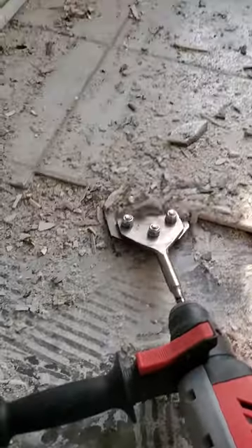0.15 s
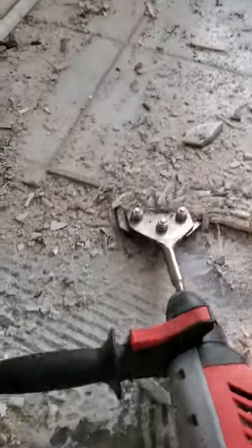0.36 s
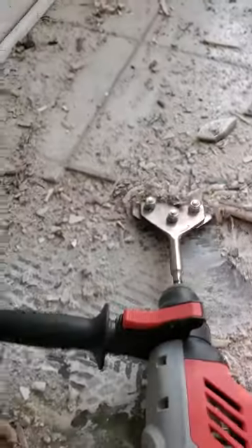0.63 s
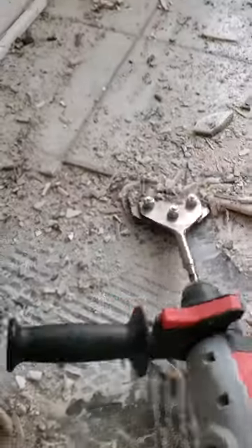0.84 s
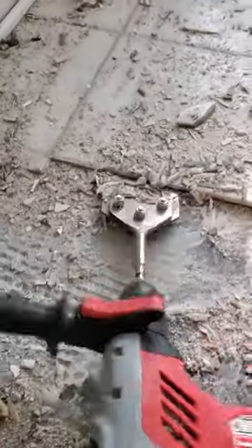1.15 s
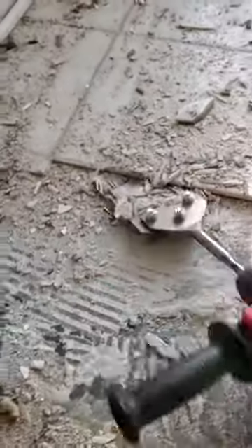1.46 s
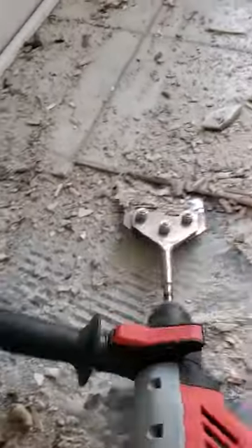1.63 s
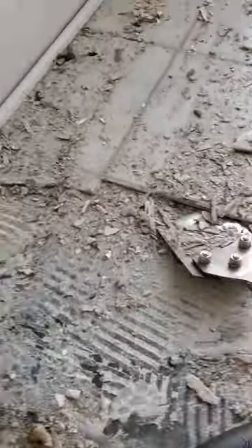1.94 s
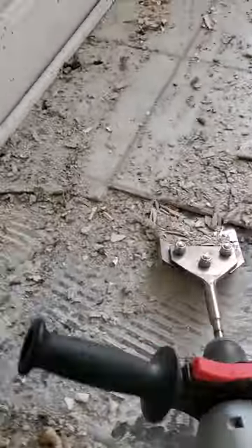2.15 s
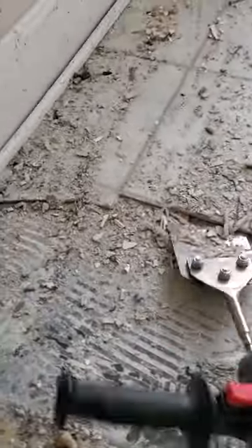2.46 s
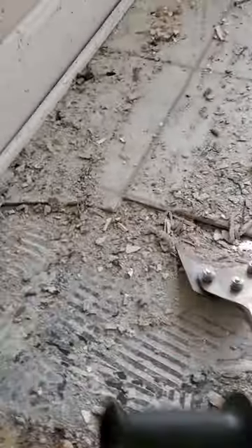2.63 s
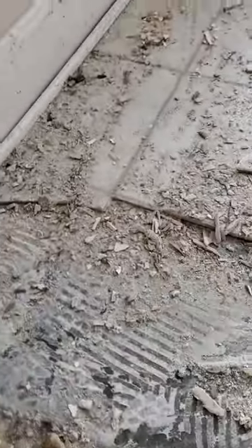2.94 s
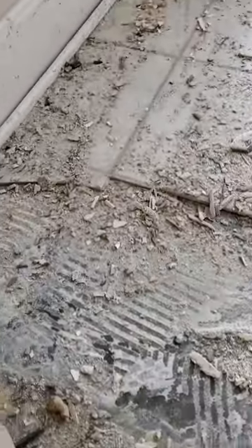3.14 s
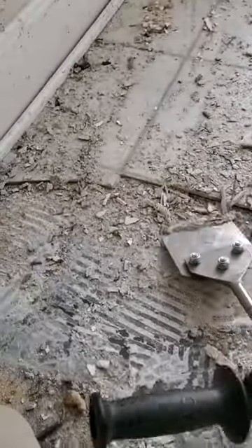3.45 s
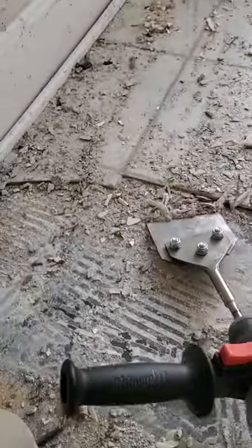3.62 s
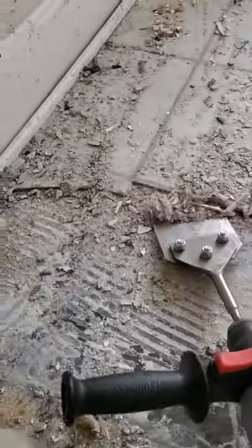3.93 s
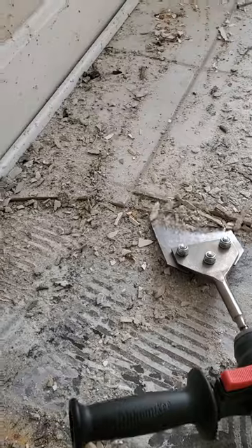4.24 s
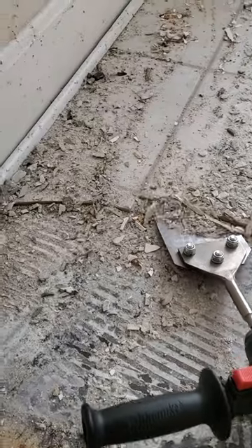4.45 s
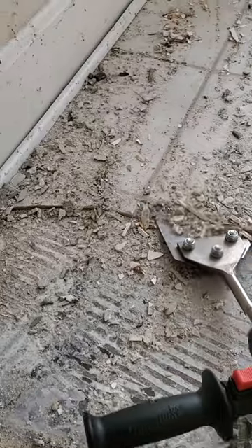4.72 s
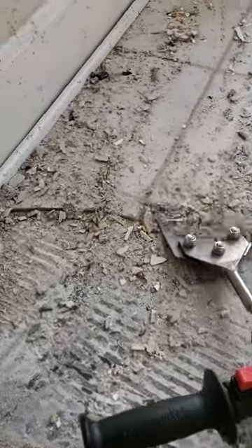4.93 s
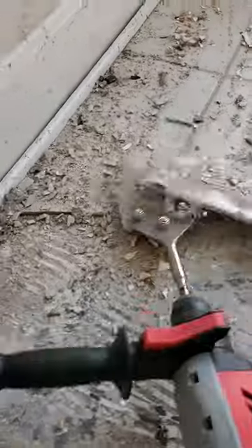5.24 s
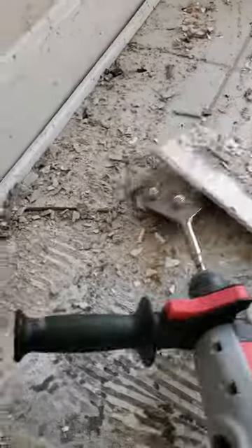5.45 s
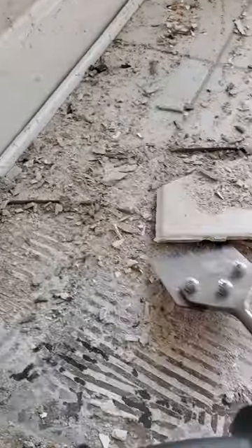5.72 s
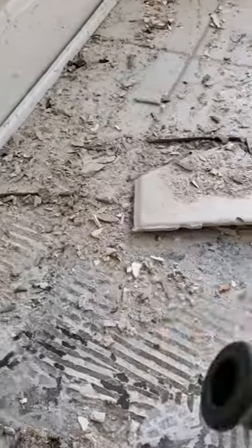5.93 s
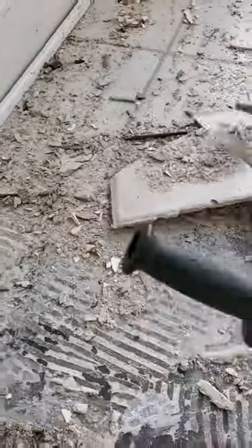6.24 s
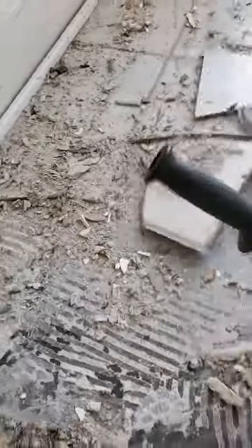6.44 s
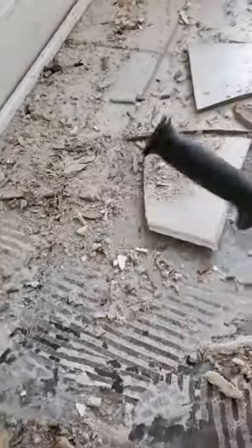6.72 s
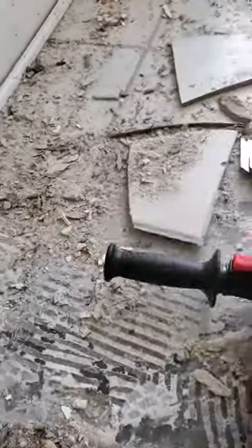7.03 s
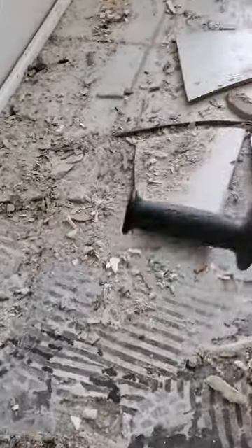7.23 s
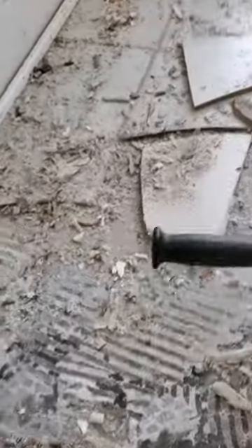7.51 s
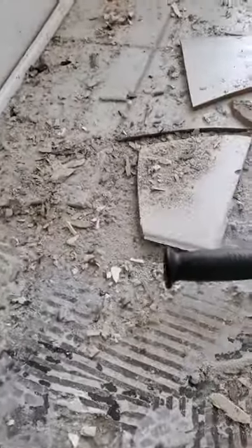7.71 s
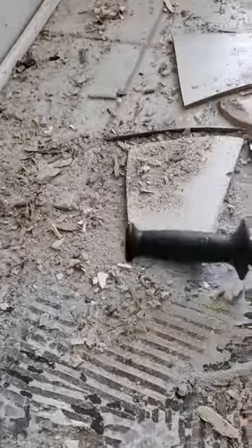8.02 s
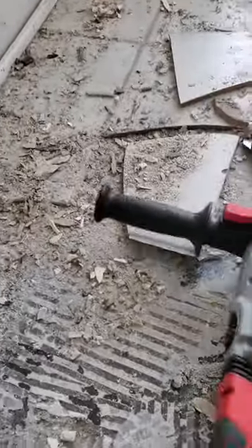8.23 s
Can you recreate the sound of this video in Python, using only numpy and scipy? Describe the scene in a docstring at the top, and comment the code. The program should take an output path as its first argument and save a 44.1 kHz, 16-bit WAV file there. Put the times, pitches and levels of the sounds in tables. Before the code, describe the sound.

Close up in a bare, slightly echoing room, a rotary hammer rattles its wide steel blade against tile in short, harsh bursts. It lifts and the motor whirs down. Low mains hum surfaces while the blade drags through grit and knocks against shards. Then the motor spins up for more uneven volleys of hammering, with whirring alone between them and pieces of tile clacking.

```python
"""A rotary hammer with a wide steel scraper blade chips tile off a concrete floor in a bare room.
Each crank turn lands a blow, heard while the blade is pressed on; lifted, the motor whirs and coasts down.
In the pause mains hum comes up, the blade drags through grit in clumps of clicks and knocks ring on shards.
The motor then spins up again for more bursts of blows, whirring alone between them.
Coloured noise, ringing resonances and low sines make the tool; feedback delays make the room."""
import sys
import numpy as np
from scipy import signal
from scipy.fft import rfft, irfft, next_fast_len
from scipy.io import wavfile
from scipy.ndimage import uniform_filter1d

SR = 44100
rng = np.random.default_rng(int(sys.argv[2]) if len(sys.argv) > 2 else 0)


def unload_wav(signal):
    """Save mono or channel-first audio to the path in sys.argv[1] as 16-bit WAV at rate SR, clipped to [-1, 1]."""
    wavfile.write(
        sys.argv[1],
        SR,
        np.round(np.clip(np.atleast_2d(signal).T, -1, 1) * 32767).astype(np.int16),
    )


def convert_level_to_amplitude(level_db):
    """Map a level in decibels to its linear amplitude factor."""
    exponent = np.asarray(level_db, float) / 20
    return 10 ** exponent


N = 369116
TIME = np.arange(N) / SR
SIZE = next_fast_len(N)
HZ = np.maximum(np.fft.rfftfreq(SIZE, 1 / SR), 1)


def rms_one(x):
    """Scale to rms 1."""
    return x / np.sqrt(np.mean(x ** 2) + 1e-20)


def in_time(rows):
    """Columns of a curve at every sample."""
    s, *columns = np.transpose(rows)
    return [np.interp(TIME, s, c) for c in columns]


def held(rows, rise, fade, fall, last_steepness=1):
    """Level columns of events that rise, fade while held and fall (dB per s); the loudest event counts."""
    start, length, *columns = np.transpose(rows)[:, :, None]
    coarse_time = TIME[::64]
    since = coarse_time - start
    shape = rise * np.minimum(since, 0)
    shape = shape - fade * np.clip(since, 0, length)
    shape = shape - fall * np.maximum(since - length, 0)
    shapes = [shape] * (len(columns) - 1) + [last_steepness * shape]
    levels = []
    for db, s in zip(columns, shapes):
        loudest = np.maximum((db + s).max(axis=0), -120)
        levels.append(np.interp(TIME, coarse_time, loudest))
    return levels


def noise():
    """Two unrelated white noises."""
    return rng.standard_normal((2, N))


def grains(per_s, spread_db):
    """Random clicks, most small and a few large."""
    return (rng.random(N) < per_s / SR) * convert_level_to_amplitude(spread_db * np.minimum(rng.exponential(1, N), 4))


def dying(clicks, t60):
    """Each click leaves an exponential decay."""
    return signal.lfilter([1], [1, -convert_level_to_amplitude(-60 / (t60 * SR))], clicks + 1e-18)


def band(x, low_hz, high_hz):
    """Band-pass."""
    return signal.sosfilt(signal.butter(3, [low_hz, high_hz], "band", fs=SR, output="sos"), x)


def at_hz(points):
    """A curve over log frequency on the FFT grid."""
    hz, value = np.transpose(points)
    return np.interp(np.log(HZ), np.log(hz), value)


def colour(pair, spectrum, alike_share=1.):
    """Two excitations, as mid and side, become left and right: spectrum, likeness, balance per frequency."""
    # how alike the two sides are: (frequency [Hz], likeness [0-1])
    likeness = [(60, 0.99), (300, 0.91), (700, 0.87), (1400, 0.04), (3000, 0), (7000, 0.06), (15000, 0)]
    # stereo balance: (frequency [Hz], left over right [dB])
    left_over_right = [(60, -0.5), (180, -2.5), (550, 0), (1650, 1), (4970, -4), (15000, 0.5)]
    mid, side = rfft(pair, SIZE) * convert_level_to_amplitude(at_hz(spectrum))
    alike = np.clip(alike_share * at_hz(likeness), 0, 1)
    lean = convert_level_to_amplitude(at_hz(left_over_right) / 2)
    mid, side = mid * np.sqrt(1 + alike), side * np.sqrt(1 - alike)
    return rms_one(irfft([(mid + side) * lean, (mid - side) / lean], SIZE)[:, :N])


def place(pair, pan_db, lag):
    """Lean to one side (positive = left); left arrives lag samples after right."""
    return np.array([np.roll(pair[0], lag), pair[1]]) * convert_level_to_amplitude([[pan_db / 2], [-pan_db / 2]])


def resonance(x, centre_hz, width_hz):
    """A resonance that stays put."""
    r = np.exp(-np.pi * width_hz / SR)
    return rms_one(signal.lfilter([1, 0, -1], [1, -2 * r * np.cos(2 * np.pi * centre_hz / SR), r * r], x))


def moving_resonance(x, centre_hz, width_hz):
    """A resonance whose centre may move, as when the tile loosens, stepped in short blocks."""
    out, state, r = np.zeros_like(x), np.zeros((2, 2)), np.exp(-np.pi * width_hz / SR)
    for i in range(0, N, 512):
        a = [1, -2 * r * np.cos(2 * np.pi * centre_hz[i] / SR), r * r]
        out[:, i:i + 512], state = signal.lfilter([1, 0, -1], a, x[:, i:i + 512], zi=state)
    return rms_one(out)


def steel(clicks):
    """Every click rings the modes of blade and shank with fresh strengths on each side."""
    # steel blade and shank: (mode [Hz], level [dB], t60 [s])
    modes = [(750, -27, 0.12), (1717, -2.5, 0.03), (4000, 1, 0.024), (7520, 7, 0.014),
             (11300, 16.5, 0.0064), (12400, -9, 0.0091), (13550, 9, 0.014)]
    out = np.zeros((2, N))
    for hz, level_db, t60 in modes:
        r, w = convert_level_to_amplitude(-60 / (t60 * SR)), 2 * np.pi * hz / SR
        strike = clicks * noise() + 1e-18
        out += signal.lfilter([0, convert_level_to_amplitude(level_db) * np.sin(w)], [1, -2 * r * np.cos(w), r * r], strike)
    return out


def room(x):
    """Eight feedback delays a side, duller on every round, then cut to length."""
    t60_s, wall_cut_hz = 0.61, 13500
    size = next_fast_len(N + SR)
    w = 2 * np.pi * np.fft.rfftfreq(size)
    wall = 1 / (1 + 1j * w * SR / (2 * np.pi * wall_cut_hz))
    out = np.zeros((2, len(w)), complex)
    for k, lag in enumerate(rng.uniform(.012, .04, 16) * SR):
        loop = convert_level_to_amplitude(-60 * lag / SR / t60_s) * wall * np.exp(-1j * w * lag)
        out[k % 2] += loop / (1 - loop) * (-1) ** (k // 2)
    return irfft(out * rfft(x, size), size)[:, :N]


def hum():
    """A mains tone of steady pitch and the low air of the building, loudest in the pause."""
    # mains hum and low air: (time [s], level [dB])
    swell = [(0, -67), (.9, -59.5), (1.9, -60.5), (2.5, -45), (3.85, -44.5), (4.05, -87), (7.2, -61.5),
             (8.37, -66)]
    # low air: (frequency [Hz], level per Hz [dB])
    air_spectrum = [(15, -40), (25, -30), (53, 6.5), (92, 0.5), (120, 2.5), (223, -13.5), (734, -5.5),
                    (16000, -95)]
    mains_hz, air_over_tone_db = 119.5, 1.5
    level_db, = in_time(swell)
    tone = np.sqrt(2) * np.sin(2 * np.pi * mains_hz * TIME)
    return convert_level_to_amplitude(level_db) * (tone + convert_level_to_amplitude(air_over_tone_db) * colour(noise(), air_spectrum))


def knocks():
    """Single contacts: a crack that dies sooner the higher the band, and a short ring of the shard."""
    # knocks on shards: (time [s], crack [dB], body [dB], treble [dB], ring [Hz])
    contacts = [(1.3766, -31, -35, -42.5, 3280), (1.57, -38, -51, -51, 1680),
                (1.6458, -33, -24.5, -52, 1990), (1.696, -33.5, -32, -33, 1710),
                (2.1457, -28, -22, -41, 1820), (2.345, -23, -45, -34, 1610), (2.352, -23, -45, -27, 1610),
                (2.365, -27, -45, -38, 3300), (2.414, -30, -42, -45, 1480), (2.4325, -30, -45, -28, 4850),
                (2.52, -40, -31, -48, 700), (2.4443, -11.5, -49, -11.5, 4850),
                (2.5843, -22.5, -13, -43, 3020), (2.687, -18, -23, -26, 2900), (2.707, -13, -23, -32, 615),
                (2.72, -12, -21, -24, 1700), (2.741, -4, -22, -28, 1750), (3.225, -19, -34, -28, 1700),
                (3.611, -27, -25, -12.5, 1580), (3.663, -37, -27, -13, 1290),
                (3.71, -20.5, -38, -11.5, 1530), (3.74, -45, -45, -10, 1490), (3.782, -35, -43, -22, 1280),
                (3.83, -29.5, -47, -21, 3620), (4.226, -23, -26, -11, 3300), (4.4665, -23, -42, -35, 1700),
                (4.4917, -13, -38, -35, 1720), (4.7425, -13, -36, -21, 4700),
                (4.9863, -10.5, -9, -30, 1900), (5.687, -16.5, -45, -38, 1340),
                (6.077, -20.5, -42, -15, 3000), (6.138, -20, -30, -20, 3470),
                (6.2265, -11.5, -12.5, -37, 1930), (6.388, -17.5, -30, -28, 1390)]
    ring_t60_s = .013
    s, crack_db, body_db, treble_db, ring_hz = np.transpose(contacts)
    at, out = np.round(s * SR).astype(int), np.zeros((2, N))
    ranges = [(body_db, 150, 1000, .06), (crack_db, 1000, 8000, .022), (treble_db, 8000, 16000, .012)]
    for level_db, low_hz, high_hz, t60 in ranges:
        clicks = np.zeros(N)
        clicks[at] = convert_level_to_amplitude(level_db)
        burst = dying(clicks, t60) * noise()
        out += band(burst + .5 * burst[::-1] + clicks, low_hz, high_hz)   # half shared between sides
    t = TIME[:3000]
    for i, db, hz in zip(at, crack_db, ring_hz):
        out[:, i:i + len(t)] += convert_level_to_amplitude(db - 60 * t / ring_t60_s) * np.sin(2 * np.pi * hz * t)
    return out * convert_level_to_amplitude([[-2.5], [2.5]])   # leans right


def grit_texture():
    """Grit crushed and rolled: dense uneven clicks in clumps, over a steady part."""
    clumps = rms_one(dying(dying(grains(70, 1.9), 0.048), 0.046))
    clicks = 0.5 + dying(grains(400, 4), 0.012)
    return (.4 + clumps) * clicks


def drag():
    """Grit under the blade's edge: other clumps in each range, the blade ringing, shards pushed along."""
    # strokes through grit: (start [s], length [s], grit [dB], treble [dB], rumble [dB])
    strokes = [(2.135, 0.017, -44, -45, -41.5), (2.21, 0.077, -41.5, -43.5, -56),
               (2.335, 0.015, -38, -38.5, -66), (2.41, .02, -40, -60, -70),
               (2.46, 0.062, -39.5, -43.5, -60), (2.52, 0.022, -42, -58, -36),
               (2.588, 0.011, -33, -42, -37.5), (2.625, 0.025, -29.5, -27.5, -42),
               (2.68, .02, -25.5, -25, -50), (2.715, 0.057, -18, -17, -62), (2.81, 0.1, -23.5, -16.5, -52),
               (2.95, 0.11, -31.5, -43, -66), (3.05, 0.036, -24, -26.5, -70),
               (3.09, 0.062, -25.5, -21, -66), (3.15, 0.087, -23.5, -17, -68), (3.29, 0.067, -25, -26, -69),
               (3.4, 0.12, -32.5, -32, -43), (3.56, 0.14, -34, -29.5, -56), (3.76, 0.074, -49, -42, -60),
               (3.886, 0.011, -27.5, -45, -47)]
    # grit: (frequency [Hz], level per Hz [dB])
    grit_spectrum = [(82, -41), (140, -5), (226, -21), (589, 2.5), (1330, 6), (1730, 6.5), (2160, -2),
                     (3210, 1.5), (14100, -1), (15500, 21), (16500, -75)]
    # shards pushed along ring in bursts: (centre [Hz], width [Hz], level over the grit [dB])
    shards = [(630, 270, -26), (716, 60, -26), (994, 47, -24), (1700, 51, -31.5), (3270, 160, -18.5)]
    blade_ring_db, shard_wander = -15, .08   # wander: rms drift of the shards' pitch (share)
    # dB per s; the negative fade lets a stroke grow slightly
    grit_db, treble_db, rumble_db = held(strokes, rise=484, fade=-3.5, fall=334)
    grit = colour(noise(), grit_spectrum) + convert_level_to_amplitude(blade_ring_db) * rms_one(steel(np.ones(N)))
    ranges_hz = [(300, 714), (1200, 2360), (2600, 6380), (5000, 7640)]
    mids = rms_one(sum(grit_texture() * band(grit, low, high) for low, high in ranges_hz))
    for hz, width_hz, db in shards:
        drift = rms_one(band(rng.standard_normal(N), 1.0, 5.5))
        ring = moving_resonance(grit, hz * (1 + shard_wander * drift), width_hz)
        mids = mids + convert_level_to_amplitude(db) * grit_texture() * ring
    treble = rms_one(grit_texture() * band(grit, 9330, 14450))
    rumble = rms_one(band(grit_texture() * noise(), 114, 365))
    sound = convert_level_to_amplitude(grit_db) * mids + convert_level_to_amplitude(treble_db) * treble + convert_level_to_amplitude(rumble_db) * rumble
    return place(sound, pan_db=-2.0, lag=4)


def crank():
    """Speed and turns so far, summed run by run; speed sags under load and coasts off the trigger."""
    # one table a run of the motor: (time [s], speed [turns per s])
    runs = [
        [(0, 75.5), (.3, 77.04), (.55, 72.24), (.8, 49.24), (1.4, 29.24), (2.1, 15.4)],
        [(3.85, 22.99), (4.05, 59.2), (4.25, 71.27), (4.5, 77.18), (4.95, 73.06), (5.4, 81.86), (5.6, 67.42),
         (6.05, 51.7), (6.2, 69.08), (6.48, 81.47), (6.75, 56.11), (7.15, 41.87), (7.4, 72.35), (7.75, 77.58),
         (8.05, 70.34), (8.37, 88.06)],
    ]
    # where the crank stands as each run begins: [turns]
    start_turn = [0, .74]
    speed, turns = np.zeros((2, N))
    for rows, start in zip(runs, start_turn):
        first_s, last_s = rows[0][0], rows[-1][0]
        run = in_time(rows)[0] * ((TIME >= first_s) & (TIME <= last_s))
        turns = np.where(TIME >= first_s, np.ceil(turns[-1]) + start + np.cumsum(run) / SR, turns)
        speed = speed + run
    return speed, turns


def motor(speed, turns, pushed):
    """Fan and gear noise swelling with the stroke, piston puffs in the housing, low sines of the crank."""
    # fan and gears: (frequency [Hz], level per Hz [dB])
    whir_spectrum = [(18, -56), (30, -41), (65, -38), (190, -32), (276, -35), (470, -28), (620, -8.5),
                     (1660, 0), (3660, 2.5), (7470, -1.5), (9230, -10), (15200, -6.5), (16500, -59)]
    # the shell hums along: (centre [Hz], width [Hz], level over the whir [dB])
    housing = [(290, 38, -29), (731, 30, -20.5)]
    # crank and armature: (multiple of crank speed, level over the whir [dB])
    orders_of_crank = [(1, -36), (2, -33), (3, -40), (3.9, -33)]
    full_speed, speed_power = 92.4, 1.865   # turns per s; the whir grows with this power of the speed
    whir_db, loaded_db = -21.5, -9.5   # at full speed; change while the blade is pushed
    throb, second, patchy_db, puff_db = .15, .046, 1.8, -17   # throb: once and twice a turn

    level = (speed / full_speed) ** speed_power * convert_level_to_amplitude(whir_db + loaded_db * pushed)
    level = uniform_filter1d(level, size=3000)
    angle = 2 * np.pi * uniform_filter1d(turns, size=5000)
    stroke = 1 + throb * np.cos(angle) + second * np.cos(2 * angle)
    teeth = 1 + .5 * dying(grains(360, 1.6), 0.0064)      # gear teeth click unevenly
    even_whir = colour(stroke * teeth * noise(), whir_spectrum)

    # each range flickers on its own
    whir = np.zeros((2, N))
    edges = np.geomspace(30, 16500, num=8)
    for low, high in zip(edges, edges[1:]):
        flicker_db = patchy_db * rms_one(band(rng.standard_normal(N), 4.8, 17.0))
        whir += band(even_whir, low, high) * convert_level_to_amplitude(flicker_db)
    for hz, width_hz, db in housing:
        whir += convert_level_to_amplitude(db) * resonance(noise()[0], hz, width_hz)

    # one puff a turn gives gliding harmonics
    once_a_turn = np.diff(np.floor(angle / (2 * np.pi)), prepend=0)
    puffs = rms_one(band(once_a_turn * convert_level_to_amplitude(2.5 * rng.standard_normal(N)), 460, 1350))
    orders = sum(convert_level_to_amplitude(db) * np.sin(k * angle) for k, db in orders_of_crank)
    return place(level * (whir + convert_level_to_amplitude(puff_db) * puffs + orders), pan_db=-2.0, lag=5)


def pressing():
    """Levels of blade, slab and floor thump (dB) as the blade is pushed against the tile and lifted."""
    # pushes: (start [s], length [s], blade [dB], slab [dB], thump [dB])
    pushes = [(.03, 0.053, -25.5, -24, -37), (.155, .01, -31, -25.5, -52), (.17, 0.033, -18, -23, -32.5),
              (.245, 0.041, -22, -29, -42), (.3, 0.11, -28.5, -25, -43), (.385, 0.038, -21.5, -22, -37.5),
              (.46, 0.17, -20.5, -22.5, -38), (.67, 0.037, -28, -29, -64), (3.93, 0.028, -25, -34, -44),
              (3.97, 0.15, -18.5, -30.5, -38.5), (4.175, .01, -32, -27, -52), (4.19, 0.047, -22, -27, -39),
              (4.3, 0.045, -32, -30, -67), (4.372, 0.052, -19.5, -24.5, -38), (4.465, 0.023, -24, -27, -72),
              (4.53, 0.095, -20, -26.5, -38.5), (4.69, 0.041, -23, -25.5, -40),
              (4.766, 0.18, -21.5, -27.5, -39), (4.885, 0.13, -28, -25, -55),
              (5.05, 0.025, -19, -23, -34.5), (5.195, 0.062, -20.5, -27.5, -41),
              (6.115, 0.0093, -19.5, -26.5, -40), (6.225, 0.032, -21.5, -22.5, -40),
              (6.4, 0.055, -20, -31.5, -52), (6.47, 0.22, -18.5, -29, -39), (7.352, 0.1, -23.5, -25, -43.5),
              (7.46, 0.13, -26.5, -27, -48), (7.62, 0.21, -25.5, -28.5, -43),
              (7.76, 0.13, -22.5, -25.5, -37.5), (7.86, 0.041, -15, -35, -43),
              (7.93, 0.049, -21, -26, -32.5), (8.0, 0.033, -31, -24, -45), (8.04, 0.021, -21, -30, -34)]
    # dB per s; the thump comes and goes more steeply than the rest
    return held(pushes, rise=618, fade=3, fall=384, last_steepness=3.7)


def loose_chips(chatter):
    """Blows ring loose chips, one pitch at a time; a chip lasts a blow or two."""
    pitches_hz = np.geomspace(900, 6000, num=9)
    dealt = np.repeat(rng.integers(0, len(pitches_hz), N // 900 + 1), 900)[:N]
    chips = np.zeros((2, N))
    for k, hz in enumerate(pitches_hz):
        chips += resonance(chatter * (dealt == k) * noise(), hz, width_hz=420)
    return rms_one(chips)


def blows(turns, blade_db, slab_db, thump_db):
    """One blow a turn: the blade chatters on the slab for a few ms, tile and body ring, the floor thumps."""
    # what rings under the blade: (time [s], tile [Hz], tile over slab [dB], hollow body over slab [dB])
    ringing_tile = [(0, 2070, -21, -36), (.4, 2010, -23, -11.5), (.7, 2000, -6, -8.5),
                    (4.2, 1970, -31, -11.5), (4.32, 2000, -16, -47), (4.48, 1700, -1.5, -36),
                    (4.62, 1780, -12, -48), (4.95, 2330, -9, -15), (6.25, 2040, -22, -14),
                    (6.6, 1470, 0.5, -5), (7.4, 1560, -6, -9), (7.55, 1720, -1.5, -28),
                    (7.73, 2070, -0.5, -18), (7.85, 1890, -15, -14.5), (8.05, 1840, -2, -7.5)]
    # spectra of blade, slab and thump: (frequency [Hz], level per Hz [dB])
    blade_spectrum = [(6000, -14), (7500, 3), (8700, -15.5), (10500, 2.5), (12100, 16), (13600, 6),
                      (15200, 13), (16000, -9), (16300, -64)]
    slab_spectrum = [(120, -37), (200, -16), (520, 0), (727, -2), (839, 2), (1250, 0.5), (1950, 7),
                     (3750, 9), (4120, 4), (9000, 7), (11700, 10.5), (19800, -120)]
    thump_spectrum = [(15, -27), (26, -21), (42, 2), (103, 3), (270, -3), (300, -3), (390, -4.5),
                      (660, -120)]
    jitter_s, uneven_db, lead_s = .0003, 1.4, .002   # uneven: how much blows differ in strength
    blade_ring_db, shank_db, chip_db = -17, -12, -5   # ring over the blade; shank and chips over the slab
    tile_hz, tile_db, body_db = in_time(ringing_tile)

    at = np.flatnonzero(np.diff(np.floor(turns))) - round(lead_s * SR)
    chance = rng.standard_normal((len(at), 2))
    strength = convert_level_to_amplitude(uneven_db * chance[:, 1])
    jitter = (jitter_s * SR * chance[:, 0]).astype(int)
    piston, strikes = np.zeros((2, N))
    piston[np.maximum(at, 0) + 30] = strength      # strictly in step with the crank
    strikes[np.clip(at + jitter, 0, N - 1)] = strength
    clicks = rms_one(strikes)

    crack = rms_one(dying(dying(strikes, .004), .006))   # steel meets steel, briefly
    contact = rms_one(dying(dying(strikes, 0.0045), 0.015))      # pressure surges, then falls within ms
    chatter = contact * (3.3 + dying(grains(3000, 1.9), 0.0043))      # tiny rebounds
    even_chatter = rms_one(chatter)
    debris = .14   # shards rattle on between blows

    # paired weights are mid and side
    blade_noise = (even_chatter + crack * [[.8], [.35]] + debris) * noise()
    blade = colour(blade_noise + clicks * [[.4], [.15]], blade_spectrum)
    blade = blade + convert_level_to_amplitude(blade_ring_db) * rms_one(steel(chatter))
    slab_noise = (even_chatter / 2 + crack * [[.5], [.2]] + debris / 2) * noise()
    slab = colour(slab_noise + clicks * [[.65], [.2]], slab_spectrum, alike_share=0.45)

    push = rms_one(piston) + 0.15 * chatter * noise()      # alike pushes give lines at the blow rate
    ringing = convert_level_to_amplitude(tile_db) * moving_resonance(push, tile_hz, width_hz=300)
    ringing += convert_level_to_amplitude(body_db) * resonance(push, centre_hz=657.0, width_hz=157)
    ringing += convert_level_to_amplitude(shank_db) * resonance(push, centre_hz=3900, width_hz=700)
    ringing += convert_level_to_amplitude(chip_db) * loose_chips(chatter)

    # the floor shakes the microphone
    shake = dying(contact, 0.0029) * (noise() + [[.05], [0]])
    thump = colour(shake, thump_spectrum, alike_share=0.36)
    sound = convert_level_to_amplitude(blade_db) * rms_one(blade) + convert_level_to_amplitude(slab_db) * (slab + ringing) + convert_level_to_amplitude(thump_db) * thump
    return place(sound, pan_db=-1.0, lag=-2)


def scene():
    """Tool and shards in the room, hum all round."""
    room_db = -13.5
    speed, turns = crank()
    blade_db, slab_db, thump_db = pressing()
    near = blows(turns, blade_db, slab_db, thump_db)
    near = near + motor(speed, turns, pushed=blade_db > -36) + drag()
    hits = knocks()
    return near + hits + convert_level_to_amplitude(room_db) * room(near + hits / 3) + hum()


def roll_off(x):
    """The treble ends steeply here."""
    return signal.sosfilt(signal.butter(12, 16970, fs=SR, output="sos"), x)


def record(dry):
    """Peaks are rounded softly, then a steep low-pass cuts the top."""
    rounded = .85 * np.tanh(dry / .85)
    low_pass = signal.ellip(8, .5, 45, 15950, fs=SR, output="sos")
    mix = signal.sosfilt(low_pass, rounded)
    return roll_off(mix)


dry = scene()
out = record(dry)
unload_wav(out)
```